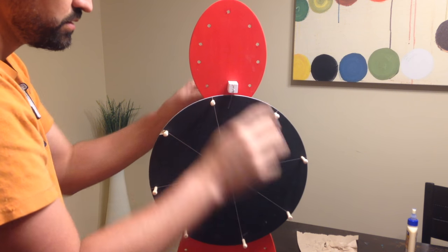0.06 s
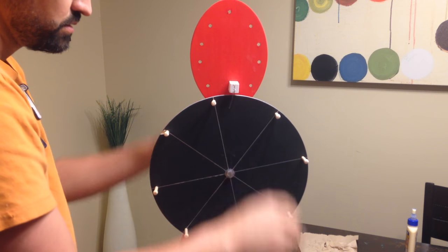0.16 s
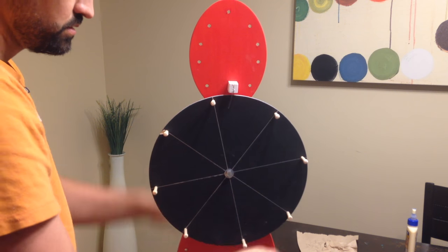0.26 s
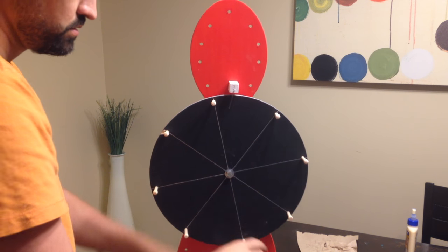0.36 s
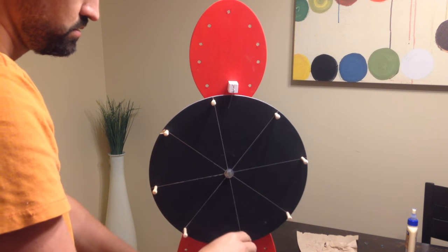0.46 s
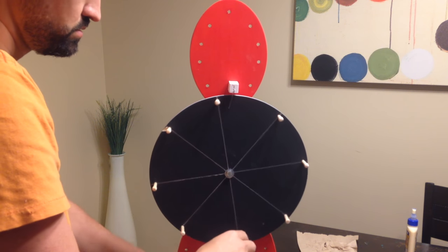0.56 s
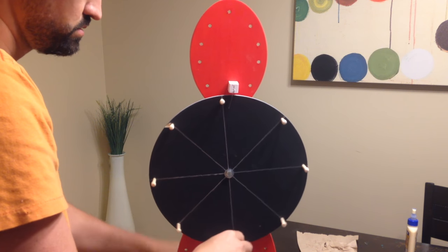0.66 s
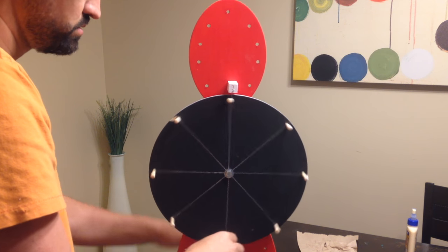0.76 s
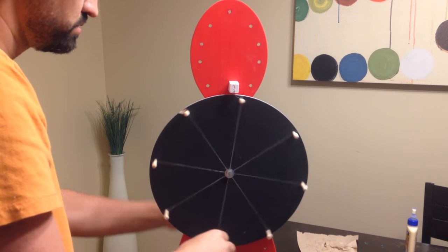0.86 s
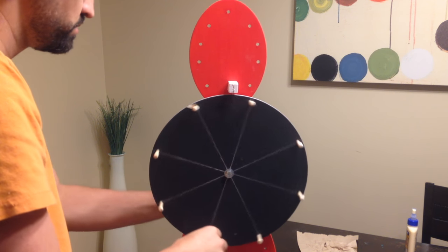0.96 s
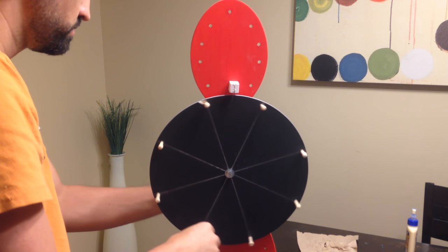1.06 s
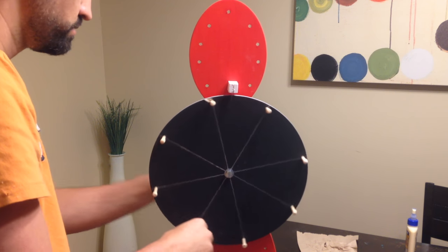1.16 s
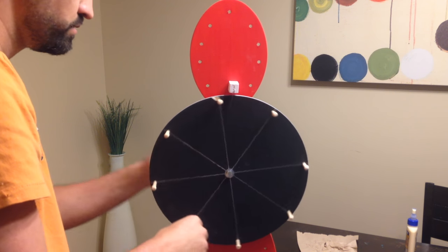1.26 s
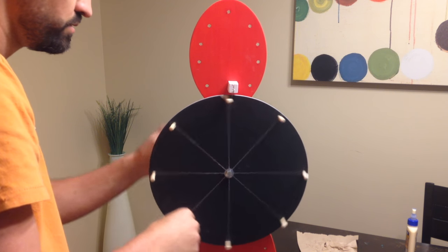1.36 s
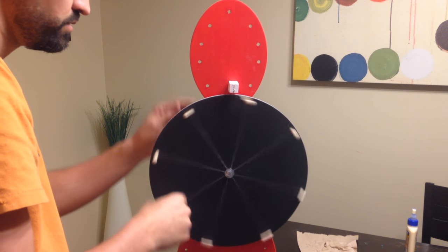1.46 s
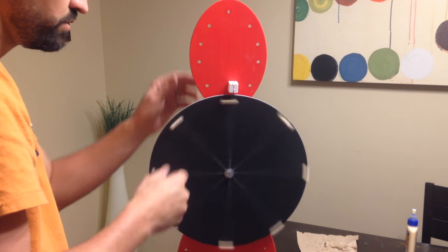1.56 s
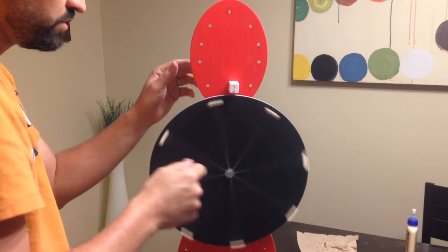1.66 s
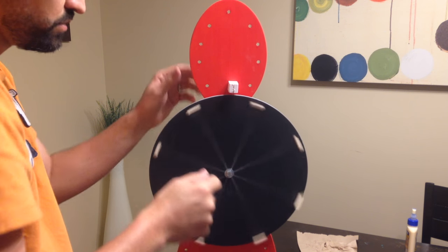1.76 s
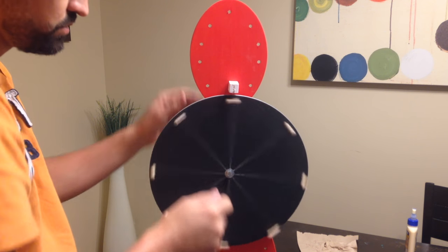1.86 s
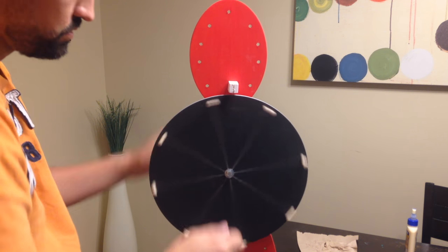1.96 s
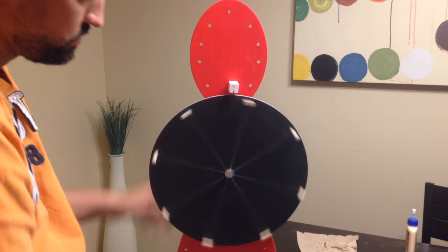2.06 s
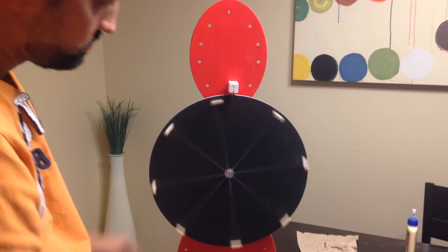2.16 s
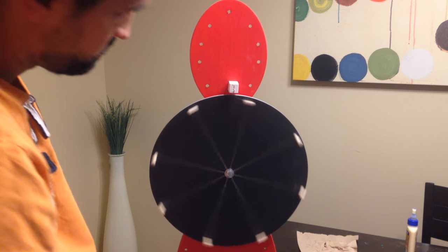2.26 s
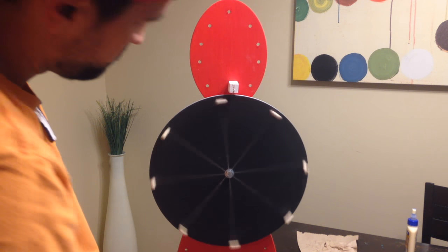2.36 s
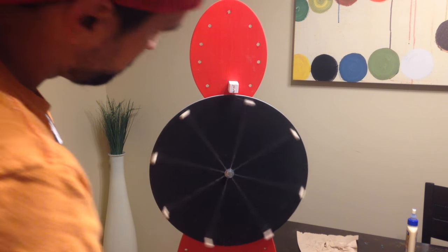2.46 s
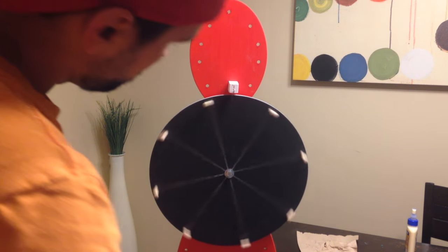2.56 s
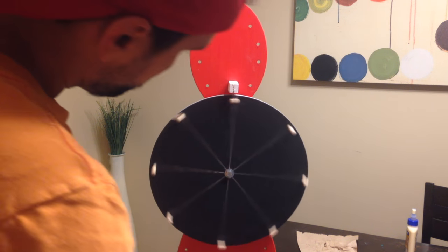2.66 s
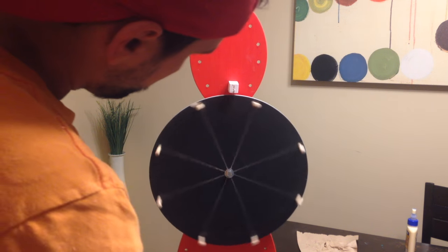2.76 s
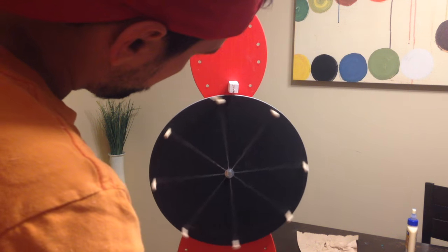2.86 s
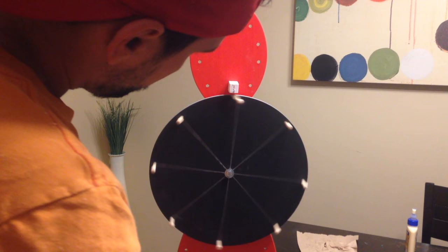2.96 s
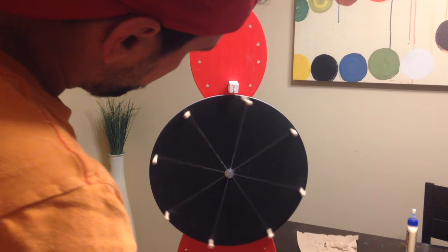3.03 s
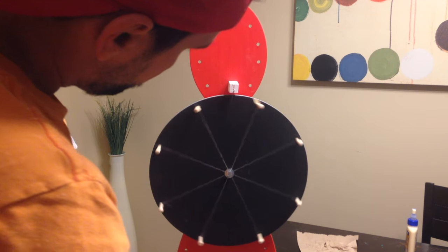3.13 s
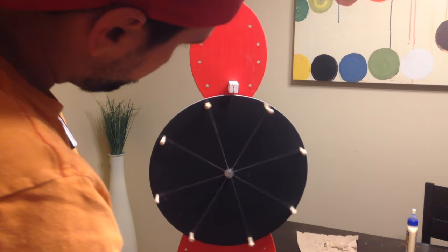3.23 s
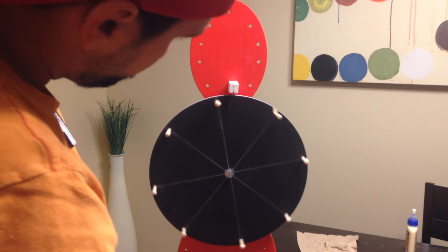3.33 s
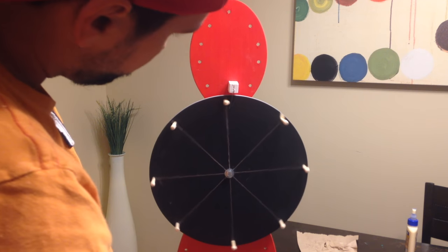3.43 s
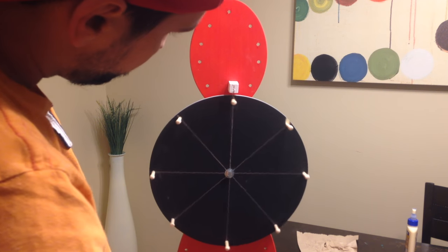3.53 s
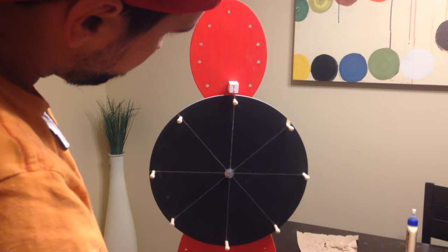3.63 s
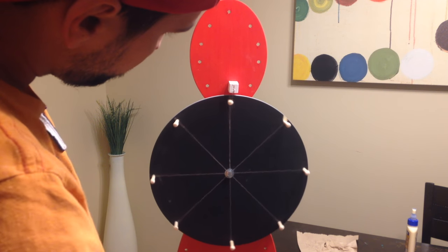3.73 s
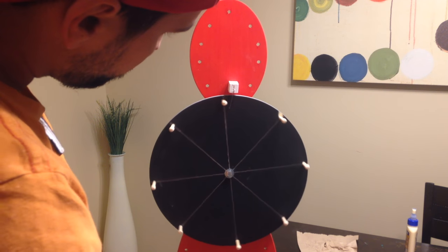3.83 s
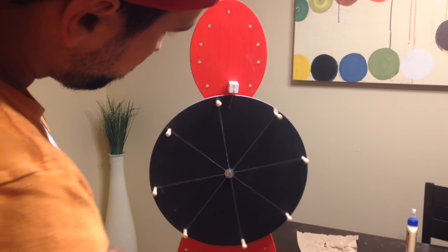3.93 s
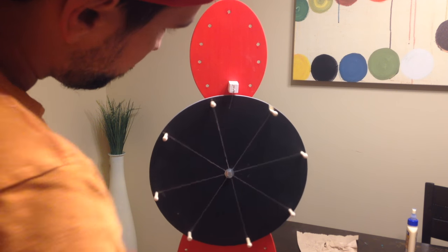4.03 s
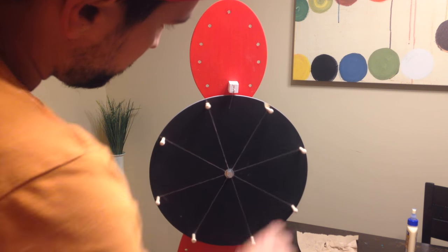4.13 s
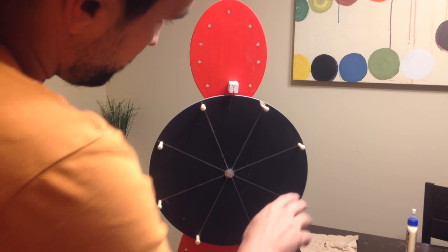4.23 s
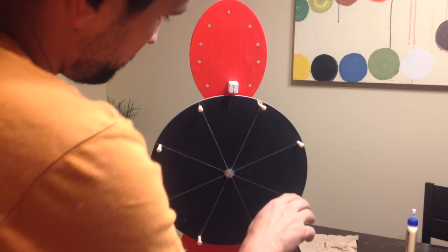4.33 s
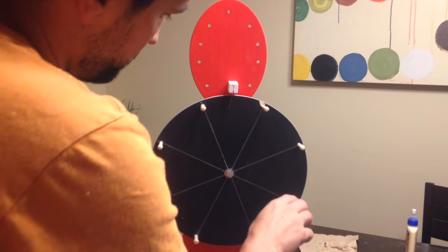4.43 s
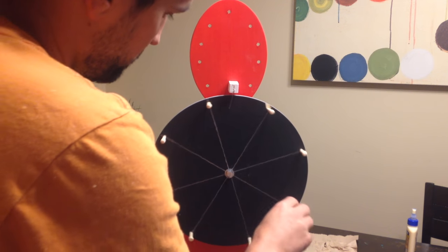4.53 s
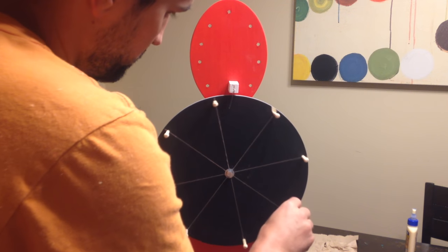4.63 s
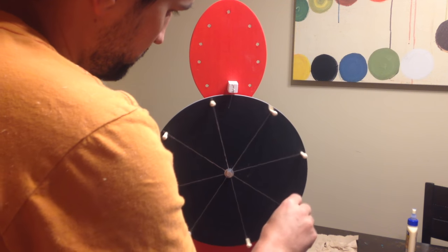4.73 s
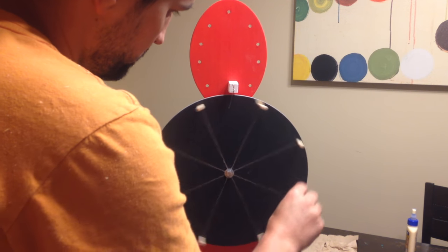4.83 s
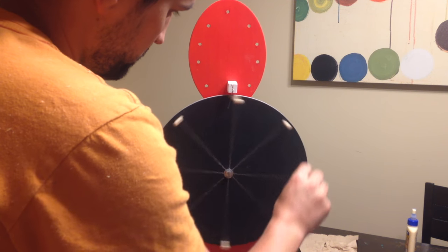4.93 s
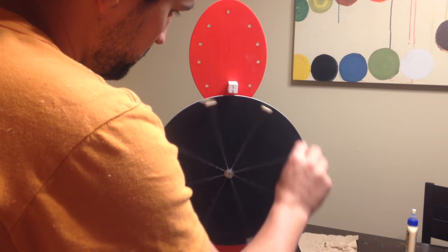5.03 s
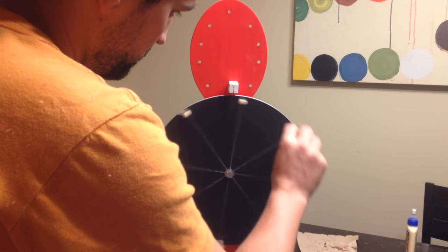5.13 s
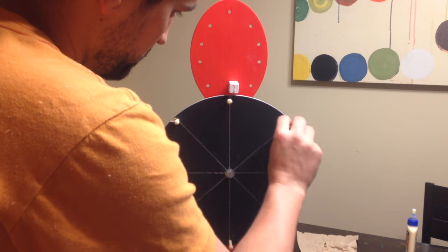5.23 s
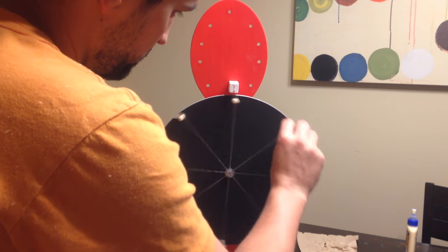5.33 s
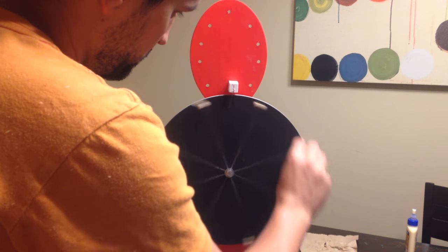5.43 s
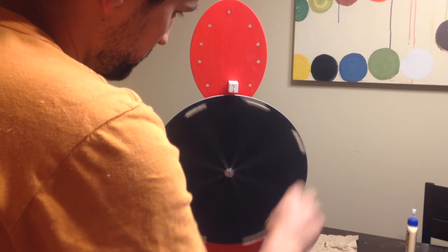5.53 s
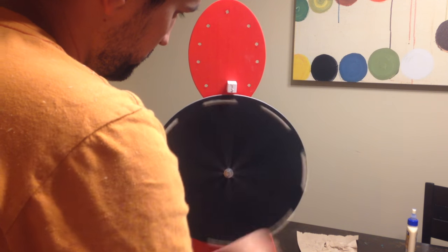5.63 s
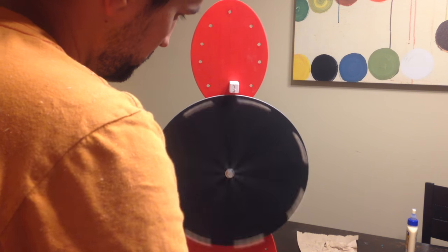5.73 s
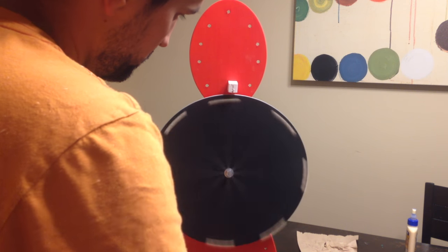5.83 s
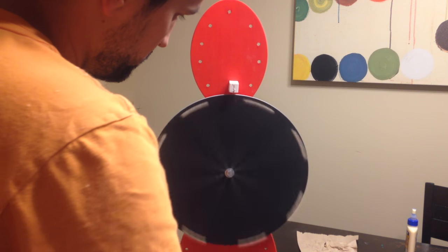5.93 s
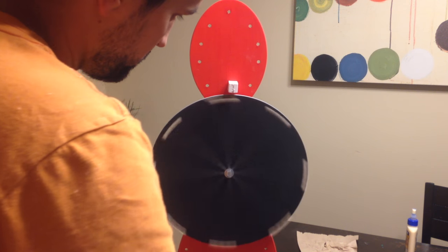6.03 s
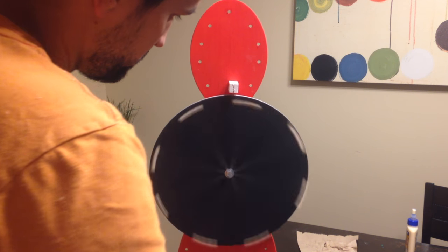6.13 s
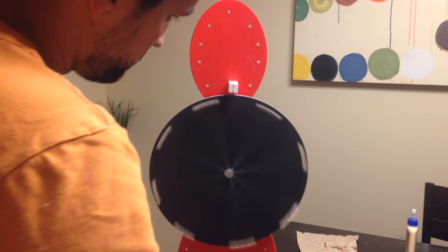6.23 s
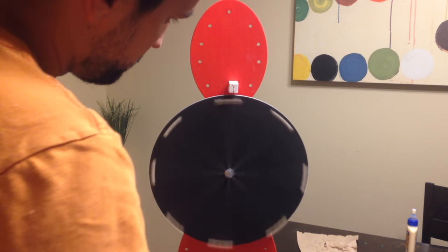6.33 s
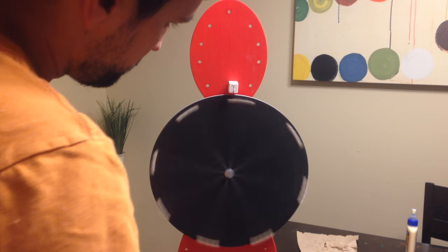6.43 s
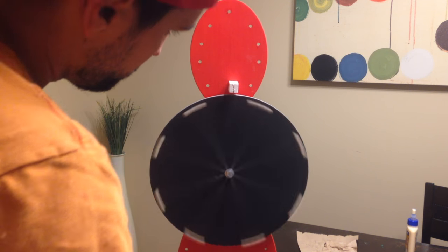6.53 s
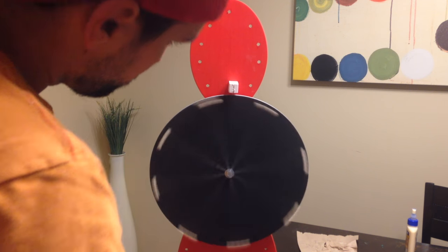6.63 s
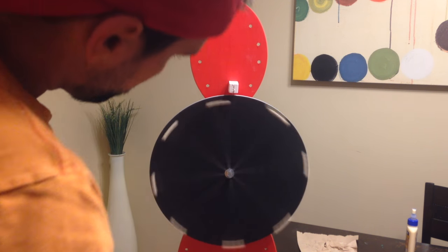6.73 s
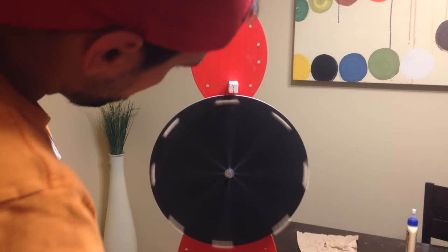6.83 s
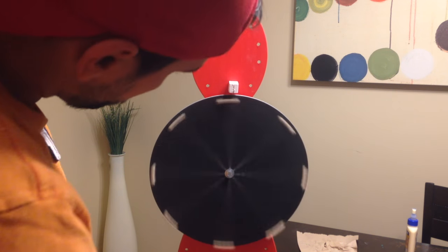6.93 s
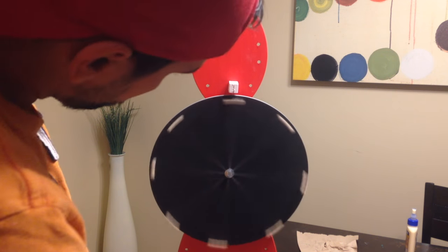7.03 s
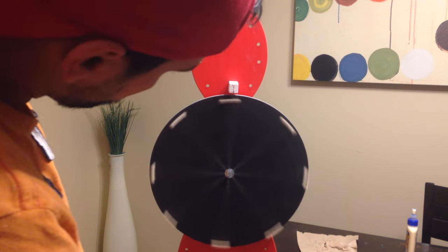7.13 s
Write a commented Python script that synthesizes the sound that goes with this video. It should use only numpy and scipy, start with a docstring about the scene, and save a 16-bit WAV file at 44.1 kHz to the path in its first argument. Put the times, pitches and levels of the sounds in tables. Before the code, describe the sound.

Hard plastic flapper knocked by wheel pegs, heard close with short indoor reverberation. Each pass is a knock followed by a sharp snap and a brief woody, hollow ring around one kilohertz. First hand-moved clicks, then a short leisurely run that slows and dies; a long hush with barely audible taps; then a fast, louder ratcheting burst with soft low thuds from the disc, slowing only slightly before the cut.

```python
"""Prize wheel, two spins.

A homemade wheel with eight pegs is spun gently, then hard, in a small room, and coasts against friction and drag.
Each peg knocks a plastic flapper, rebounds, bends and scrapes it; the freed flapper cracks back and rings its mount.
Knocks and cracks are filtered noise bursts, rings are decaying sines; the disc drums softly.
Small ticks and taps sound between; steady room air and a low hum lie underneath."""
import sys
import numpy as np
from scipy import signal
from scipy.fft import rfft, irfft
from scipy.io import wavfile
from scipy.ndimage import uniform_filter1d

SR = 44100
rng = np.random.default_rng(int(sys.argv[2]) if len(sys.argv) > 2 else 0)


def persist_wave(psi):
    """Save psi, clipped to +-1, as 16-bit WAV."""
    counts = np.round(np.clip(psi, -1, 1) * 32767).astype(np.int16)
    wavfile.write(sys.argv[1], SR, np.atleast_2d(counts).T)


N = 316946
HZ = np.fft.rfftfreq(4096, 1 / SR)
T = np.arange(SR // 2) / SR


def amp(db):
    """Decibels to gain."""
    return 10 ** (np.asarray(db) / 20)


def read(points, hz):
    """Interpolates a (frequency [Hz], value) table over log frequency."""
    f, value = np.transpose(points)
    return np.interp(np.log(hz + 1), np.log(f + 1), value)


def unit(x):
    """Scales a sound to the energy of 10 ms at full level."""
    return x * np.sqrt(SR / 10 ** 2 / np.sum(x ** 2))


def add(mix, start_s, sound):
    """Mixes a sound in at start_s, in place."""
    part = mix[max(round(start_s * SR), 0):][:len(sound)]
    part += sound[:len(part)]


def click(db):
    """Minimum-phase click with the spectrum db over HZ."""
    mirrored_db = np.concatenate([db, db[-2:0:-1]])
    log_gain = np.log(amp(mirrored_db))
    impulse = np.fft.ifft(np.exp(np.conj(signal.hilbert(log_gain)))).real
    return unit(impulse[:len(db)])


def contact(decay_s, rise_s):
    """A blow as a dense noise spray of tiny slips that swells and dies; unit energy."""
    t = T[:2000]
    force = rng.standard_normal(len(t)) * np.exp(-t / decay_s) * (1 - np.exp(-t / rise_s))
    return force / np.linalg.norm(force)


def blow(colour, decay_s, rise_s):
    """Contact force exciting a coloured click."""
    return signal.fftconvolve(contact(decay_s, rise_s), colour)


def envelope(t60_s, rise_s):
    """Exponential decay with a soft onset."""
    return np.exp(-np.log(1000) * T / t60_s) * (1 - np.exp(-T / rise_s))


def mode(hz, t60_s, rise_s):
    """One resonance: a decaying sine with a soft onset."""
    return np.sin(2 * np.pi * hz * T) * envelope(t60_s, rise_s)


# room air spectrum: (frequency [Hz], relative density [dB per Hz])
AIR = [(20, -33), (40, -24), (60, -15), (140, -18), (230, -23), (600, -28.5), (1330, -34), (2000, -33.5),
       (3200, -41.5), (4300, -37.5), (6000, -44), (10000, -49.5), (15500, -51.5)]
# hum partials: (frequency [Hz], RMS level [dB])
HUM = [(59.2, -62), (118.4, -77)]
AIR_DB = -69.5  # RMS above 150 Hz


def background():
    """Steady shaped-noise room air and an appliance's low hum as sines."""
    hz, t = np.fft.rfftfreq(N, 1 / SR), np.arange(N) / SR
    spectrum = rfft(rng.standard_normal(N)) * amp(read(AIR, hz))
    air = irfft(spectrum, N) / np.std(irfft(spectrum * (hz > 150), N))
    hum = sum(amp(db) * np.sqrt(2) * np.sin(2 * np.pi * (f * t + rng.random())) for f, db in HUM)
    return amp(AIR_DB) * air + hum


# room decay: (frequency [Hz], T60 [s])
ROOM = [(200, 1.47), (700, 0.77), (2000, 0.6), (5000, 0.49), (13000, 0.5)]


def diffuse(build_s=0.0056):
    """Reverberant noise tail of unit energy that dies band by band."""
    hz, t, bands = signal.stft(rng.standard_normal(len(T)), SR, nperseg=256)
    bands = bands * np.exp(-np.log(1000) * t / read(ROOM, hz)[:, None])
    tail = signal.istft(bands, SR, nperseg=256)[1][:len(T)]
    tail = tail * (1 - np.exp(-T / build_s))
    return tail / np.linalg.norm(tail)


# first echoes from table and walls: (delay [ms], level [dB])
ECHOES = [(2.2, -14.5), (8.3, -11.5), (10.4, -10), (14.5, -11), (19.2, -21)]


def room(x, tail_db=-3.0, shift_hz=2.3):
    """Direct sound, scattered early echoes, and two tails whose blend turns steadily at shift_hz."""
    early = np.zeros(len(T))
    early[0] = 1
    for delay_ms, db in ECHOES:
        add(early, delay_ms / 1000, amp(db) * contact(decay_s=0.00053, rise_s=0.0001))
    turn = 2 * np.pi * shift_hz * np.arange(N) / SR
    tails = sum(signal.fftconvolve(x * share, diffuse()) for share in (np.cos(turn), np.sin(turn)))
    return (signal.fftconvolve(x, early) + amp(tail_db) * tails)[:N]


# disc rocking on its axle: (time [s], relative level [dB])
THUDS = [(1.58, -63), (5.66, -58.5), (5.739, -59.5), (5.836, -54.5), (6.021, -57.5), (6.255, -58.5),
         (6.831, -67)]


def disc():
    """Lowest drum mode of the disc, one soft decaying sine per thud."""
    out = np.zeros(N)
    for start_s, db in THUDS:
        add(out, start_s, amp(db + 8.0) * unit(mode(hz=126.3, t60_s=0.23, rise_s=0.026)))
    return out


# small ticks and taps; the first is a soft flapper snap:
# (time [s], level [dB], spectral peak [Hz], contact time [ms])
TICKS = [(.049, -58, 1130, 6.5), (0.6423, -43, 2600, 0.081), (4.148, -65.5, 1840, 3.7),
         (4.917, -72, 1870, 3.6), (5.386, -59, 1730, 9.9), (5.456, -62.5, 1600, 10),
         (5.499, -52.5, 1830, 3.5)]


def ticks(below_db=13.0, above_db=15.0, rub_ms=1.8, bend_ms=2.137):
    """Small contacts with a humped spectrum; longer ones rub more than they click."""
    out = np.zeros(N)
    # bending waves carry the treble through the board first; 1 kHz takes bend_ms
    spread = irfft(np.exp(-4j * np.pi * bend_ms * np.sqrt(HZ / 10 ** 3)))[:len(HZ) // 2]
    for start_s, db, peak_hz, contact_ms in TICKS:
        octaves = np.log2((HZ + 10) / peak_hz)
        slope_db = np.where(octaves < 0, below_db, above_db)
        colour = click(-slope_db * np.log(1 + octaves ** 2))
        force = contact(decay_s=contact_ms / 1000, rise_s=0.0001) * contact_ms / rub_ms
        force[0] += 1
        tick = signal.fftconvolve(signal.fftconvolve(force, colour), spread)
        add(out, start_s, amp(db) * unit(tick))
    return out


# modes of the flapper's mount: (frequency [Hz], relative level [dB], T60 [s])
MOUNT = [(174.6, -12.5, 0.24), (357, -23, 0.46), (511, -19, 0.4), (928, -9, 0.25), (1081, -8.5, 0.48),
         (1104, -2.5, 0.41), (1129, 0, 0.29), (1255, -2, 0.2), (1273, 4.5, 0.16), (1395, -8, 0.37),
         (1607, -7, 0.28), (1648, 0, 0.13), (2000, -21, 0.16), (2220, -12, 0.15), (2820, -19.5, 0.48),
         (2880, -7, 0.22), (2903, -14.5, 0.23), (3690, -25.5, 0.37)]


def mount(vary_db=5.0, detune=0.004):
    """Modal ring of the mount; level and pitch of each mode vary a little from blow to blow."""
    ring = np.zeros(len(T))
    for k, (hz, db, t60_s) in enumerate(MOUNT):
        level_chance, pitch_chance = rng.standard_normal(2)
        gain = amp(db + vary_db * level_chance) * (-1) ** k
        ring += gain * mode(hz * (1 + detune * pitch_chance), t60_s, rise_s=0.0038)
    return unit(ring)


# hand-set pegs in rim order: (offset from even place [deg], flapper carried for [deg],
# relative knock level at 1 turn/s [dB], mean rebound delay [ms], relative rebound level over knock [dB],
# bent-flapper ring [Hz], relative ring level over knock [dB], relative scrape level [dB])
PEGS = [(-2.0, 13.3, -45.5, 7.5, -6.5, 1990, 11.5, -55), (0.24, 10.7, -45, 9, -1, 2280, -0.5, -40),
        (-1.47, 9.8, -45.5, 10.5, -2, 2510, 1.5, -40), (1.97, 10.1, -46, 12.5, -2, 2150, 6, -49),
        (-1.24, 11.2, -43, 14, -6, 2280, 8, -47), (2.1, 11.0, -46.5, 17, -2, 2400, 4, -56),
        (-1.24, 11, -45, 16, -3, 2300, 7, -49), (2.04, 11.7, -50.5, 11.5, 0.5, 1920, 4.5, -57.5)]
FRICTION_DEG_S2, DRAG_PER_S = 123.62, 0.1026
STALL_DEG_S = 100  # no peg passes below this speed
DB_PER_DOUBLING = 9  # knock force against wheel speed
SNAP_LAG_S = 0.0075  # flapper lands this long after leaving a peg


def coast(start_s, launch_deg_s):
    """The freed wheel slows under friction and drag; pegs meet the flapper in turn until stall."""
    t = np.arange(start_s, N / SR, 1 / SR)
    friction_speed = FRICTION_DEG_S2 / DRAG_PER_S
    speed = (launch_deg_s + friction_speed) * np.exp(-DRAG_PER_S * (t - start_s)) - friction_speed
    speed = np.maximum(speed, 0)
    angle, spacing_deg = np.cumsum(speed) / SR, 360 / len(PEGS)
    last_peg = int(angle[speed > STALL_DEG_S][-1] / spacing_deg)
    for k in range(1, last_peg + 1):
        offset_deg, reach_deg, *voice = PEGS[k % len(PEGS)]
        meet_deg = k * spacing_deg + offset_deg
        meet_s, leave_s = np.interp([meet_deg, meet_deg + reach_deg], angle, t)
        turns_per_s = np.interp(meet_s, t, speed) / 360
        yield meet_s, leave_s - meet_s + SNAP_LAG_S, DB_PER_DOUBLING * np.log2(turns_per_s), voice


# releases, first peg just past the flapper: (time [s], speed [deg/s])
SPINS = [(1.5408, 354.17), (5.6308, 737.85)]
# before each spin the hand winds the first peg back over the flapper, then pushes it forward:
# (time [s], hold until snap [s], force [dB])
PUSHES = [(0.963, 0.065, -27.5), (1.479, 0.085, -23), (5.065, 0.053, -12.5), (5.605, 0.028, -5.5)]


def passes():
    """All peg-flapper meetings, pushed or coasting: (time [s], hold until snap [s], force [dB], voice)."""
    voice = PEGS[0][2:]
    pushed = [(start_s, hold_s, force_db, voice) for start_s, hold_s, force_db in PUSHES]
    return pushed + [meeting for spin in SPINS for meeting in coast(*spin)]


# peg knock spectrum, also colours scrape grit: (frequency [Hz], relative level [dB])
KNOCK = [(100, -12), (350, -11), (600, -6), (780, -3), (1000, 4), (1400, 4), (1630, 10), (1760, 7),
         (2300, 10), (2700, 3.5), (3150, -1.5), (3700, 6.5), (5000, -2), (8000, -6.5), (11000, -12),
         (15500, -15.5)]
# rubs of a peg on the nearly still wheel: (time [s], length [s], relative level [dB], centre pitch [Hz])
RUBS = [(0.53, .06, -70, 2380), (3.574, 0.043, -73, 2300)]
SCRAPE_FROM, SCRAPE_LASTS = 0.26, 0.46  # shares of the hold
SCRAPE_PITCH, SCRAPE_FOLLOWS = 1.032, 0.22  # multiple of ring pitch, share of force dB


def scrapes(width_hz=230, climb=0.081, grit_db=-9.0):
    """Friction noise drives the flapper's resonance, which climbs as the peg slides along it."""
    out, knock = np.zeros(N), click(read(KNOCK, HZ))
    slides = []
    for meet_s, hold_s, force_db, (*_, ring_hz, _, scrape_db) in passes():
        slides.append((meet_s + SCRAPE_FROM * hold_s, SCRAPE_LASTS * hold_s,
                       scrape_db + SCRAPE_FOLLOWS * force_db, SCRAPE_PITCH * ring_hz))
    lowpass = signal.butter(2, width_hz, fs=SR, output="sos")
    for start_s, length_s, db, hz in RUBS + slides:
        u = np.linspace(-.5, .5, max(round(length_s * SR), 2))
        drive, grit = rng.standard_normal((2, len(T)))[:, :len(u)]
        # shift noise down, low-pass, shift back: a gliding resonance
        carrier = np.exp(2j * np.pi * np.cumsum(hz * (1 + climb * u)) / SR)
        squeak = (carrier * signal.sosfilt(lowpass, drive / carrier)).real
        grit = signal.fftconvolve(grit, knock)[:len(u)]
        scrape = squeak / squeak.std() + amp(grit_db) * grit / grit.std()
        add(out, start_s, amp(db - 2.5) * np.cos(np.pi * u) * scrape)
    return out


# flapper crack spectrum, also colours the peg's graze: (frequency [Hz], relative level [dB])
CRACK = [(100, -22), (700, -9), (1500, 13.5), (2900, 8.5), (3300, 4), (4800, 0.5), (5300, -1), (6500, -0.5),
         (9000, -1), (11500, -5.5), (14000, -3.5), (16000, -9)]
# flapper slap on the mount: (frequency [Hz], relative level [dB])
SLAP = [(100, -18.5), (800, -12), (1000, -5), (1200, 5), (1450, -6.5), (1630, 2), (2000, -9.5),
        (2850, -7.5), (3300, -18.5), (8000, -47)]
# returning flapper: (time [s], relative mount-ring level [dB], relative crack level [dB])
SNAP_LEVELS = [(1.03, -42.5, -46), (2.2, -42, -46.5), (3.14, -45, -47), (5.12, -52, -52.5),
               (5.68, -40.5, -46), (6.04, -39.5, -40.5), (6.24, -43.5, -49), (7.17, -44, -46)]


def snaps():
    """The freed flapper slides off, cracks against its stop, chatters, and rings the mount."""
    cracks, rings = np.zeros(N), np.zeros(N)
    crack, slap = click(read(CRACK, HZ)), click(read(SLAP, HZ))
    times_s, *levels = np.transpose(SNAP_LEVELS)
    for meet_s, hold_s, _, _ in passes():
        snap_s = meet_s + hold_s
        ring_db, crack_db = (np.interp(snap_s, times_s, level) for level in levels)
        slide_off = blow(crack, decay_s=0.0085, rise_s=0.008)
        add(cracks, snap_s - 0.007, amp(crack_db - 9.5) * slide_off)
        add(cracks, snap_s - 0.0018, amp(crack_db - 2.5) * blow(crack, decay_s=0.002, rise_s=0.0037))
        add(cracks, snap_s + 0.001016, amp(ring_db - 1.0) * blow(slap, decay_s=0.0071, rise_s=0.0018))
        add(rings, snap_s + 0.001047, amp(ring_db + 3.0) * mount())
    return cracks, rings


def twang(hz, t60_s, sag, rough=0.069, settle_s=0.0058, rise_s=0.0048):
    """The bent flapper's note starts sharp, sags, and wavers as its tip chatters on the peg."""
    chatter = uniform_filter1d(rng.standard_normal(len(T)), size=40)
    bend = sag * (np.exp(-T / settle_s) - np.exp(-1))
    pitch_hz = hz * (1 + bend + rough * chatter / chatter.std())
    return unit(np.sin(2 * np.pi * np.cumsum(pitch_hz) / SR) * envelope(t60_s, rise_s))


def pegs(wander_db=3.0, rebound_spread=0.12):
    """Each peg grazes the tip, knocks, rebounds; the held flapper twangs at a pitch set by where it is caught."""
    knocks, rings, crack = np.zeros(N), np.zeros(N), click(read(CRACK, HZ))
    for meet_s, _, force_db, (knock_db, rebound_ms, bounce_db, ring_hz, ring_db, _) in passes():
        # no two knocks are alike
        knock = click(read([(f, db + wander_db * rng.standard_normal()) for f, db in KNOCK], HZ))
        first_db = knock_db + force_db
        rebound_db = first_db + bounce_db
        rebound_s = meet_s + rebound_ms / 1000 * np.exp(rebound_spread * rng.standard_normal())
        graze = blow(crack, decay_s=0.0014, rise_s=0.0005)
        add(knocks, meet_s - 0.0015, amp(first_db - 8.0) * graze)
        add(knocks, meet_s, amp(first_db + 1.0) * blow(knock, decay_s=0.0096, rise_s=0.0036))
        add(knocks, rebound_s, amp(rebound_db + 2.0) * blow(knock, decay_s=0.0046, rise_s=0.0011))
        first_twang = twang(ring_hz, t60_s=0.025, sag=0.064)
        add(knocks, meet_s + 0.001005, amp(first_db + ring_db - 3.0) * first_twang)
        second_twang = twang(ring_hz, t60_s=0.019, sag=0.043)
        add(knocks, rebound_s, amp(rebound_db + ring_db - 5.0) * second_twang)
        add(rings, meet_s, amp(first_db - 2.0) * mount())
    return knocks, rings


def scene():
    """Knocks, cracks, scrapes and ticks fill the room; mount rings, disc and background stay dry."""
    knocks, peg_rings = pegs()
    cracks, snap_rings = snaps()
    in_room = room(knocks + cracks + scrapes() + ticks())
    return (in_room + peg_rings + snap_rings + disc() + background())[None]


EDGE_HZ = 15650


def record(dry):
    """Band limit: linear-phase low-pass at EDGE_HZ."""
    lowpass = signal.firwin(511, EDGE_HZ, window=("kaiser", 8), fs=SR)
    return signal.oaconvolve(dry, lowpass[None], "same")


dry = scene()
out = record(dry)
persist_wave(out)
```